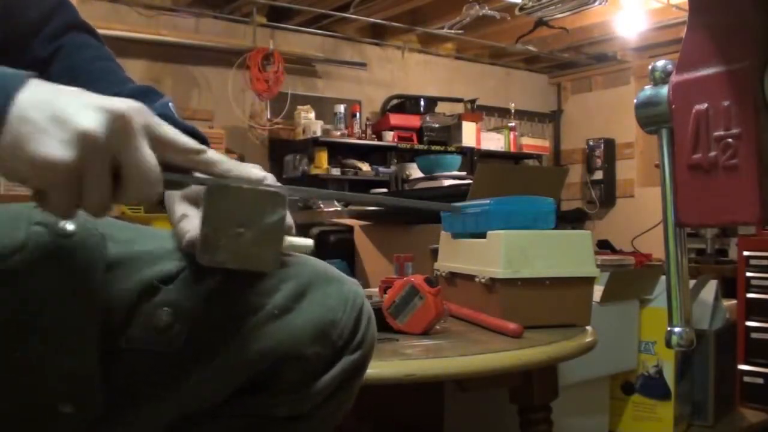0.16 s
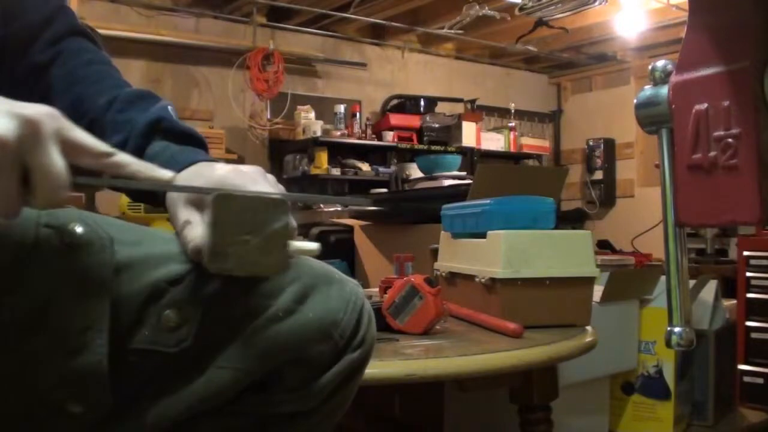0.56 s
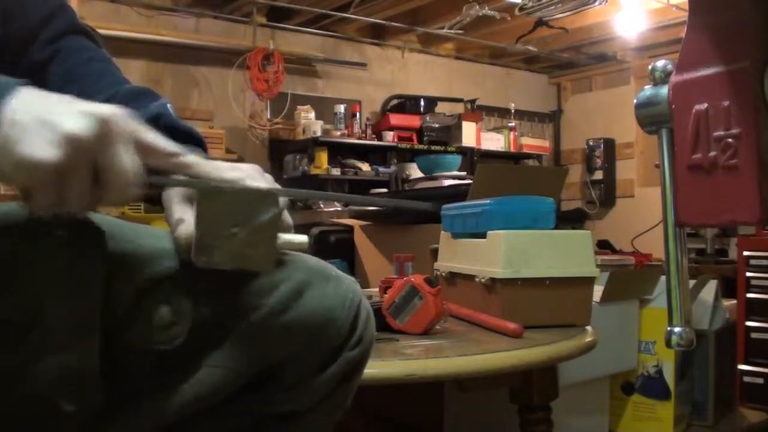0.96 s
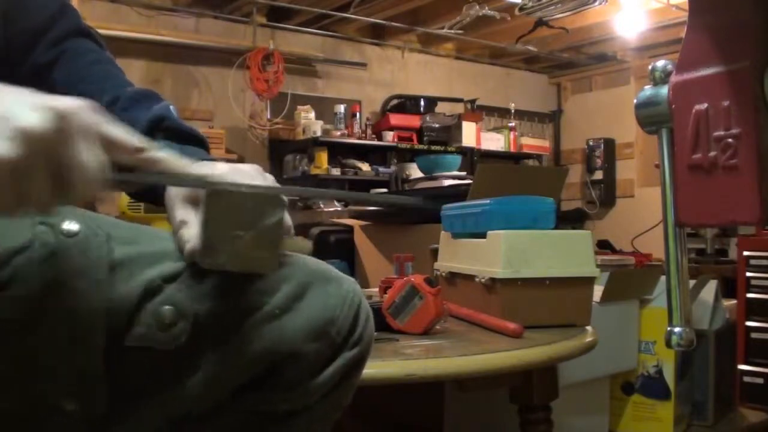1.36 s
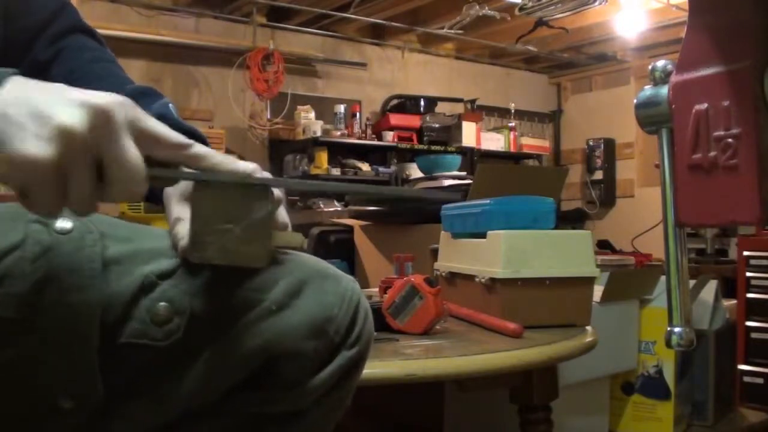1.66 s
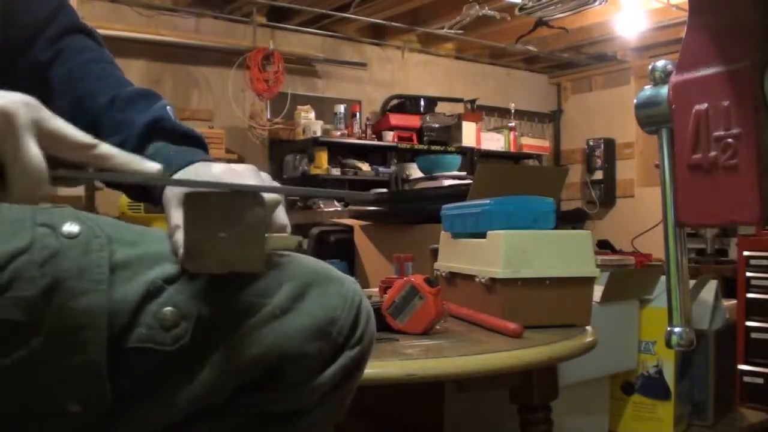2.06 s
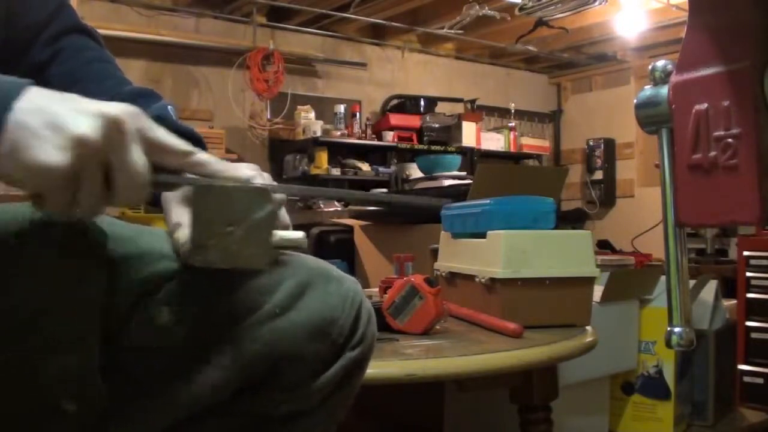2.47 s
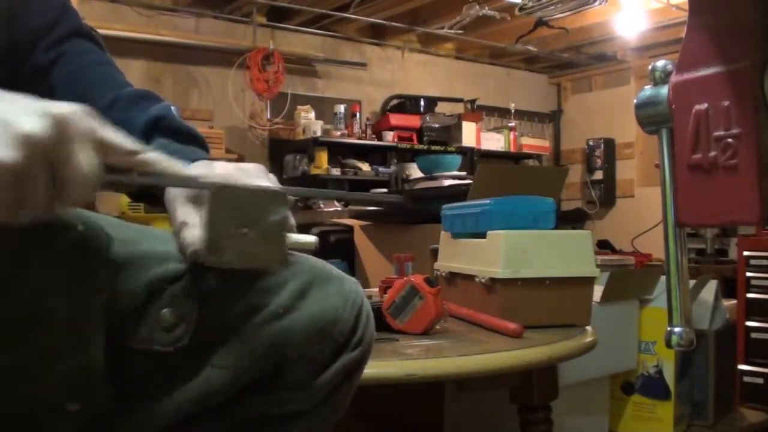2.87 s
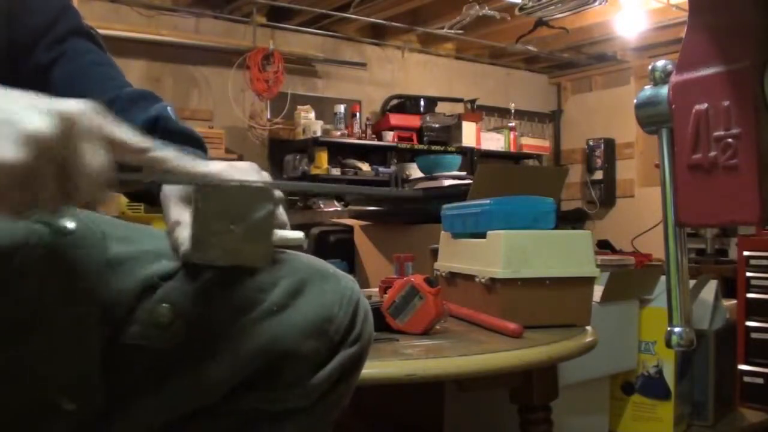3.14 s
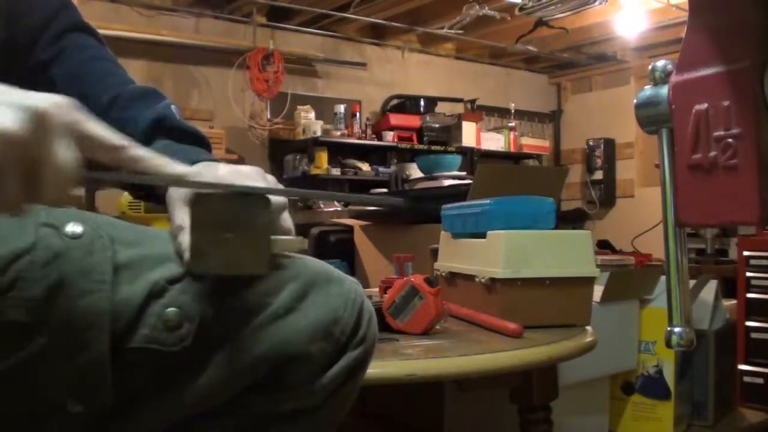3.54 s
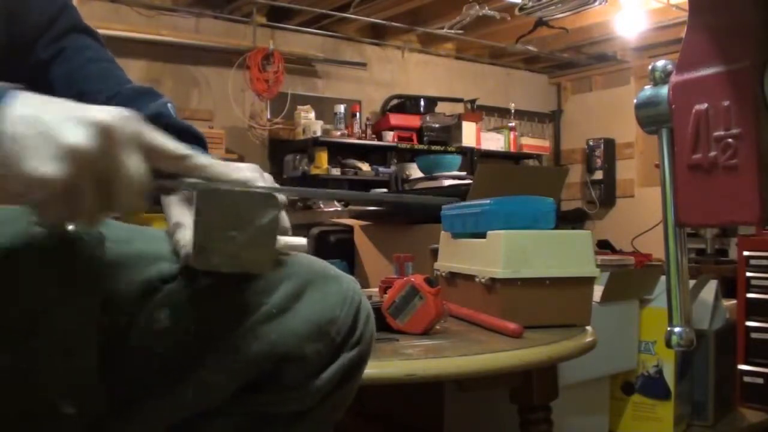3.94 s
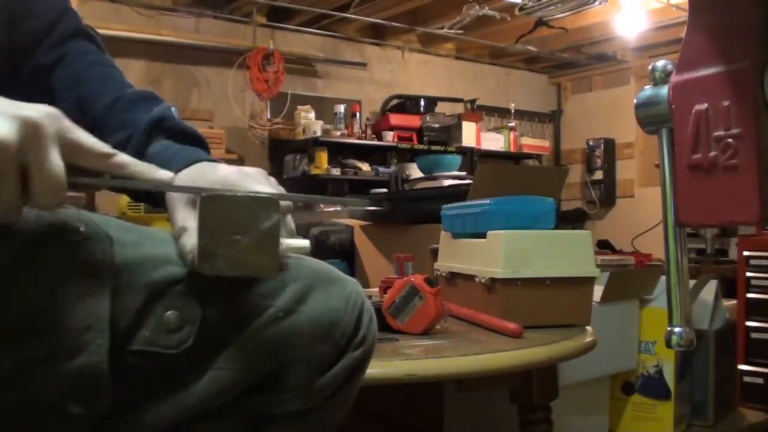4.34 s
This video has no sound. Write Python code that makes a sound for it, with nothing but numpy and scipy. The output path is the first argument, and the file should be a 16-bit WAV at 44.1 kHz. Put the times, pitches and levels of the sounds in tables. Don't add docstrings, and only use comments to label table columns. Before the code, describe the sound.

Close up, a steel hand file rasps to and fro on a small wooden block in a basement workshop. Short, gritty strokes alternate push and pull about eight times a second, bright and metallic. A sharp squeak and wooden click come early, a stuttering squeak just before one second, and a rough scrape and chirp near the end. Dull knocks sit underneath; a nearby stereo microphone catches slight room reverberation.

```python
import sys
import numpy as np
from scipy import signal
from scipy.fft import rfft, irfft, next_fast_len
from scipy.io import wavfile
from scipy.ndimage import uniform_filter1d, map_coordinates

SR = 44100
rng = np.random.default_rng(int(sys.argv[2]) if len(sys.argv) > 2 else 0)


def gain_from_decibels(decibels):
    exponent = np.asarray(decibels, float) / 20
    return 10 ** exponent


def store_wav(level_fs):
    pcm = np.round(np.clip(np.atleast_2d(level_fs), -1, 1) * 32767)
    wavfile.write(sys.argv[1], SR, pcm.T.astype(np.int16))


N = 198538

# f/Hz, width/Hz, level/dB
BLOCK_MODES = [(776.6, 128, -4.5), (945, 130, 1.5), (1182, 26, 0.5)]
BLADE_MODES = [(1415, 19, 3.5), (1475, 160, -5.5), (1600, 100, 0), (1747, 95, -7.5)]
SPINE_MODES = [(1894, 54, 0.5), (2154, 93, 3.5), (2309, 126, 0.5), (2480, 80, -20)]
TANG_MODES = [(3130, 48, 3.5), (3203, 208, 0), (3485, 92, 0.5), (3840, 190, -14.5)]
STEEL_MODES = [(4213, 97, 1), (4327, 98, 3), (4483, 150, -3), (4766, 200, -9), (5210, 110, -11.5)]
# t/s, length/s, force level/dB, ring of the bar level/dB, flex of the bar level/dB
PUSHES = [(-.015, 0.066, -28.5, -18.5, -26), (0.227, .071, -28.5, -15.5, -27),
          (0.481, 0.074, -29, -18, -30), (.721, 0.088, -28.5, -18.5, -33.5),
          (0.982, .072, -29.5, -15, -31.5), (1.238, 0.068, -28, -16, -25),
          (1.489, 0.069, -28, -18.5, -23.5), (1.75, 0.059, -29, -17.5, -24), (1.991, 0.063, -33, -18, -30),
          (2.254, 0.068, -27.5, -16.5, -24), (2.502, 0.069, -27.5, -22, -31.5),
          (2.745, 0.076, -30.5, -22.5, -34.5), (3.002, .065, -26.5, -21, -27.5),
          (3.261, 0.066, -28, -18.5, -21), (3.519, 0.064, -27.5, -19, -21), (3.773, 0.073, -27, -19, -24.5),
          (4.028, 0.067, -27, -22.5, -31), (4.281, 0.058, -32.5, -27, -35.5)]
PULLS = [(0.097, 0.083, -27.5, -18, -27.5), (.354, 0.067, -26, -18.5, -28.5),
         (0.598, 0.083, -27.5, -21, -32), (.849, 0.097, -35, -24.5, -37.5),
         (1.102, 0.07, -27.5, -26.5, -32), (1.36, 0.079, -27.5, -20, -29.5), (1.611, .074, -28, -20, -31.5),
         (1.881, .062, -28, -17.5, -29), (2.127, 0.059, -27, -20.5, -25.5), (2.379, 0.067, -29, -24, -30),
         (2.615, 0.076, -28.5, -20, -32), (2.876, 0.074, -29, -21.5, -34.5), (3.126, .068, -28.5, -23, -29),
         (3.388, 0.063, -27.5, -19.5, -31.5), (3.647, 0.072, -27.5, -21, -32.5),
         (3.906, 0.065, -26.5, -24.5, -31), (4.157, 0.046, -27.5, -18, -36),
         (4.402, 0.072, -30, -20.5, -31)]
STROKES = PUSHES + PULLS


def unit(x):
    return x / np.sqrt(np.mean(x ** 2) + 1e-20)


def along(points, hz):
    f, v = np.transpose(points)
    return np.interp(np.log(hz + 1), np.log(f + 1), v)


def wobble(rate, count=N):
    coarse = np.arange(0, count + 8, 8)
    knots = rng.standard_normal(int(count * rate / SR) + 4)
    curve = map_coordinates(knots, [coarse * rate / SR])
    return np.interp(np.arange(count), coarse, 2 * np.tanh(curve / 2))


def filtered(x, response):
    m = next_fast_len(N + SR // 2)
    return irfft(rfft(x, m) * response(np.fft.rfftfreq(m, 1 / SR)), m)[..., :N]


def bent(x, shift_hz):
    turn = 2 * np.pi * np.cumsum(shift_hz) / SR
    return np.real(signal.hilbert(x, next_fast_len(N))[:N] * np.exp(1j * turn))


def one_mode(f, c, w):
    return 1j * f * w / (c * c - f * f + 1j * f * w)


def resonance(f, modes):
    return sum((-1) ** k * gain_from_decibels(db) * one_mode(f, c, w) for k, (c, w, db) in enumerate(modes))


def ring(modes, drive, wander_db):
    m = next_fast_len(N + SR // 2)
    f, out = np.fft.rfftfreq(m, 1 / SR), 0
    for k, (c, w, db) in enumerate(modes):
        fed = rfft(drive * gain_from_decibels(db + wander_db * wobble(35)), m)
        out = out + fed * (-1) ** k * one_mode(f, c, w)
    width = sum(gain_from_decibels(2 * db) * w for _, w, db in modes)
    return irfft(out, m)[:N] / np.sqrt(np.pi * width / SR)


def grit(depth_db):
    return unit(rng.standard_normal(N) * gain_from_decibels(depth_db * wobble(900) + depth_db * wobble(130)))


def patchy(x, depth_db):
    z = signal.stft(x, nperseg=256)[2]
    field = uniform_filter1d(rng.standard_normal(z.shape), size=3, axis=0)
    field = uniform_filter1d(field, size=3, axis=1)
    return unit(signal.istft(z * gain_from_decibels(depth_db * unit(field)), nperseg=256)[1][:N])


def tail(decays, count):
    hz, t, z = signal.stft(rng.standard_normal((count, SR // 2)), SR, nperseg=256)
    out = signal.istft(z * gain_from_decibels(-60 * t / along(decays, hz)[:, None]), SR, nperseg=256)[1]
    return out / np.linalg.norm(out[0])


def room_air():
    # f/Hz, density level/dB per Hz
    air_density = [(20, 9), (60, -1), (120, 13), (250, 12), (600, 13.5), (2000, -45), (8000, -32),
                   (12000, -19), (16000, -23)]
    return gain_from_decibels(-55.5) * unit(filtered(rng.standard_normal(N), lambda f: gain_from_decibels(along(air_density, f))))


def cellar_walls(near):
    # f/Hz, t60/s
    cellar_decay = [(200, 1), (1500, 0.46), (5000, 0.25), (12000, 0.23)]
    delayed = np.pad(near, (250, 0))[None]
    return signal.fftconvolve(delayed, tail(cellar_decay, count=2), axes=1)[:, :N]


def two_ports(mid, wall):
    # f/Hz, level/dB
    port_difference = [(20, -34), (60, -24), (150, -37), (300, -16), (600, -16), (1200, -14.5), (2500, -15),
                       (5000, -15.5), (9000, -12.5), (10500, -51), (12500, -89)]
    # f/Hz, level/dB
    port_lean = [(500, -0.5), (1000, 0.2), (3000, 1.06), (9000, 0.6)]
    bench = signal.fftconvolve(mid, tail([(1000, 0.041)], count=1)[0])[:N] + gain_from_decibels(-11.0) * wall
    bench = np.real(signal.hilbert(bench, next_fast_len(N))[:N] * np.exp(3j * wobble(14)))
    side = filtered(bench, lambda f: gain_from_decibels(along(port_difference, f)))
    lean = lambda f: gain_from_decibels(along(port_lean, f) * (f < 12000) * [[.5], [-.5]])
    return filtered(mid, lean) + side * [[1], [-1]]


def knocks(events, attack, sag, climb=0):
    out, t = np.zeros(N + SR), np.arange(SR // 5) / SR
    for s, db, hz, t60 in events:
        turn = 2 * np.pi * hz * t * (1 + climb * (t / 0.011 - 1))
        body = np.sin(turn) + sag * np.sin(turn * .5) * np.minimum(t / 0.012, 1)
        out[round(s * SR):][:len(t)] += gain_from_decibels(db - 60 * t / t60) * body * (1 - np.exp(-t / attack))
    return out[:N]


def block_knocks():
    # t/s, peak level/dB, f/Hz, t60/s
    slip_events = [(0.0975, -20, 2300, .015), (0.1715, -8.5, 2240, 0.026), (1.8568, -21, 1600, 0.021),
                   (3.1178, -25, 2520, 0.02), (4.4158, -12, 2350, 0.021)]
    # t/s, peak level/dB, f/Hz
    catch_events = [(.229, -19, 710), (.48, -16.5, 649), (.725, -25.5, 633), (1.238, -17, 719.5),
                    (1.49, -17, 714), (1.582, -24, 725), (1.751, -25, 720), (1.856, -27, 416),
                    (1.993, -22, 710), (2.252, -22, 642), (2.61, -31, 404.4), (3.002, -25.5, 717),
                    (3.378, -27.5, 409)]
    # t/s, peak level/dB
    push_jolts = [(.215, -45), (.593, -36), (.778, -48), (1.029, -43), (1.273, -39), (1.509, -43),
                  (1.753, -36), (2.008, -45.5), (2.254, -47), (2.51, -40), (2.785, -35), (3.034, -39.5),
                  (3.264, -41), (3.522, -41), (3.777, -37), (4.035, -34), (4.288, -44)]
    pull_jolts = [(.837, -42), (1.9, -47), (2.128, -48), (3.115, -45), (4.152, -53)]
    jolts = []
    for rows, hz in [(push_jolts, 266), (pull_jolts, 294)]:
        for s, db in rows:
            t60 = max(.095 - .004 * (db + 42), .03)
            jolts.append((s, db, hz, t60))
    catches = [(*row, 0.04) for row in catch_events]
    out = knocks(slip_events, 0.00074, sag=0.092)
    out += knocks(catches, 0.0056, sag=0.04, climb=0.23)
    return out + gain_from_decibels(2.5) * knocks(jolts, 0.0024, sag=0.45, climb=-.05)


def swing(s, hz):
    n = np.arange(round(s[0] * SR), min(N, round(s[-1] * SR)))
    shake = 1 + .015 * wobble(200, len(n))
    return n, 2 * np.pi * np.cumsum(np.interp(n / SR, s, hz) * shake) / SR


def scrape():
    # t/s, note level/dB, f/Hz, grit over note level/dB
    squeal_course = [(4.175, -38, 952, 20), (4.195, -26, 928, 4), (4.207, -28.5, 862, 17),
                     (4.231, -19.5, 888.4, 10.5), (4.297, -30, 902, 12), (4.336, -43, 866, 14),
                     (4.4, -44, 890, 9)]
    # f/Hz, width/Hz, level/dB
    chatter_modes = [(757, 150, -6), (1750, 200, 1.5), (2450, 290, 1), (3390, 370, 1.5), (4320, 144, 12),
                     (5100, 1400, -0.5), (5760, 210, 6), (7160, 290, -2)]
    s, db, hz, grit_db = np.transpose(squeal_course)
    n, turn = swing(s, hz)
    note, puffs, edges = np.zeros(N), np.zeros(N), signal.windows.tukey(len(n), .15)
    tone = np.sin(turn) + .15 * np.sin(2 * turn)
    note[n] = gain_from_decibels(np.interp(n / SR, s, db) + 1.5 + 4 * wobble(170)[n]) * edges * tone
    snap = 3 * .3 * np.cos(turn / 2) ** 28
    puffs[n] = gain_from_decibels(np.interp(n / SR, s, db + grit_db)) * edges * (grit(1.6)[n] * (1 + np.cos(turn)) + snap)
    rattle = ring(chatter_modes, puffs, wander_db=4.0)
    return note + gain_from_decibels(-7) * filtered(rattle, lambda f: 1 / (1 + (f / 8000) ** 6))


def squeal(s, hz, db, over_db):
    out, (n, turn) = np.zeros(N), swing(s, hz)
    stack = sum(gain_from_decibels(6 + 2 * wobble(110, len(n))) * np.sin(k * turn) / k ** .8 for k in range(2, 7))
    stack = stack * (.9 + .5 * wobble(900, len(n)))
    note = gain_from_decibels(3.5 * wobble(150, len(n))) * np.sin(turn) + gain_from_decibels(over_db) * stack
    out[n] = gain_from_decibels(np.interp(n / SR, s, db) + 3.0) * signal.windows.tukey(len(n), .15) * note
    return out


def squeaks():
    squeak_events = [(.176, 0.017, 978, -21, 400), (.438, 0.023, 964, -28, 500),
                     (.872, 0.019, 1193, -25.5, 2000), (.915, .02, 956, -36, -600),
                     (1.695, 0.03, 1080, -32.5, -300), (2.893, 0.013, 1172, -33, -100),
                     (3.965, 0.031, 1040, -38, 300), (4.425, 0.022, 1121, -22, -1500)]
    # t/s, level/dB
    stutter_course = [(.926, -43), (0.939, -21), (.946, -17), (0.952, -30), (.959, -22), (0.967, -38.5),
                      (.99, -27), (1.004, -50), (1.05, -40)]
    s, db = np.transpose(stutter_course)
    out = squeal(s, 914 - 110 * (s - s[0]), db, over_db=-5.5)
    fall_over_rise, swell_db = 1.28, 16.5
    for peak, rise, hz, db, glide in squeak_events:
        t = rise * np.array([-1, 0, fall_over_rise])
        out += squeal(peak + t, hz + glide * t, db - swell_db * (t != 0), over_db=-12)
    return out


def by_way(push_pull):
    return np.repeat(push_pull, [len(PUSHES), len(PULLS)])


def pressure(rise, fall, level_db, fade_db=0):
    t, force = np.arange(N) / SR, np.zeros(N)
    early_db, slack_db, late_db = by_way((1.5, 1.84)), by_way((-1.7, -0.84)), by_way((-0.24, -0.3))
    shapes = np.transpose([early_db + fade_db, slack_db, late_db - fade_db])
    for (s, length, *_), db, (early, middle, late) in zip(STROKES, level_db, shapes):
        at = s + np.array([-.03, -rise, rise, 0.28 * length, .5 * length, 0.72 * length,
                           length, length + fall, length + 2 * fall])
        level = [-50, early - 24, early - 2, early, middle, late, late - 5, late - 22, -70]
        near = slice(*np.searchsorted(t, at[[0, -1]]))
        force[near] += gain_from_decibels(np.interp(t[near], at, level) + db)
    return force


def speed():
    t, share, rate = np.arange(N) / SR, np.zeros(N), np.full(N, 150.)
    lead_s, sweep = .008, 1.45
    for s, length, *_ in STROKES:
        start, span = s - lead_s, sweep * length
        near = slice(*np.searchsorted(t, [start, start + span]))
        arch = np.sin(np.pi * np.clip((t[near] - start) / span, 0, 1) ** .75) ** .7
        top_hz = 837 * (1 + .16 * rng.standard_normal())
        share[near] = np.maximum(share[near], arch)
        rate[near] = np.maximum(rate[near], top_hz * arch)
    return share, rate


def teeth(rate):
    turn = 2 * np.pi * np.cumsum(rate * (1 + .017 * wobble(150))) / SR
    sizes = [.35, 1.2, .9, .8, .4, .3]
    return unit(sum(size * gain_from_decibels(4.5 * wobble(80)) * np.sin(k * turn) for k, size in enumerate(sizes, start=1)))


def tooth_tone(flex, share, rate):
    force = pressure(0.0056, 0.053, flex + by_way((-14, -11)), fade_db=-2.0)
    bite = force * teeth(rate) * share ** 0.47
    aired = filtered(bite, lambda f: 1 / (1 + (800 / (f + 1)) ** 6))
    parts = BLOCK_MODES + BLADE_MODES + SPINE_MODES + TANG_MODES + STEEL_MODES
    return gain_from_decibels(5) * aired + gain_from_decibels(-2) * filtered(bite, lambda f: resonance(f, parts))


def fibre_hiss(force, share):
    # f/Hz, density level/dB per Hz
    hiss_density = [(500, -34.5), (1500, -14), (4000, -4), (6500, -2), (9200, 1), (10500, -5), (12500, -14),
                    (14000, -21.5), (16000, -29)]
    hiss = unit(filtered(grit(0.34), lambda f: gain_from_decibels(along(hiss_density, f))))
    return gain_from_decibels(4) * pressure(.008, .012, force) * (.6 + .4 * share) * patchy(hiss, depth_db=3.5)


def low_modes(flex, share):
    # t/s, level/dB
    hold_course = [(0, -0.5), (.6, 1), (1, -3.5), (1.5, 0.5), (2, -0.5), (2.3, -5), (3, -2), (3.4, -7.5),
                   (4.5, -0.5)]
    # t/s, level/dB
    tilt_course = [(0, -0.5), (.6, 0), (1.2, -0.5), (1.6, -3), (2.2, 3), (2.7, -1), (3.2, 1.5), (3.8, -0.5),
                   (4.5, -1)]
    starts = np.transpose(STROKES)[0]
    hold = np.interp(starts, *np.transpose(hold_course))
    tilt = np.interp(starts, *np.transpose(tilt_course))
    load = uniform_filter1d(share, size=900) - .8
    on_block = pressure(0.0017, 0.058, flex + hold + by_way((-1.04, -9)), fade_db=3) * grit(1.9)
    on_blade = pressure(0.0052, 0.027, flex + tilt + by_way((-0.4, -1))) * grit(2.5)
    on_spine = pressure(0.0036, 0.023, flex - tilt + by_way((.8, 1))) * grit(1.2)
    out = gain_from_decibels(-4) * ring(BLOCK_MODES, on_block, wander_db=3.5)
    out += gain_from_decibels(-1.2) * bent(ring(BLADE_MODES, on_blade, wander_db=4), 260 * load)
    return out + gain_from_decibels(-2) * bent(ring(SPINE_MODES, on_spine, wander_db=5), 400 * load)


def high_modes(force, steel):
    # f/Hz, width/Hz, level/dB
    edge_modes = [(5591, 163, -5), (5680, 135, -1), (7036, 100, -11), (7201, 45, -1), (8925, 93, -9)]
    on_steel = pressure(0.0038, 0.0066, steel) * grit(0.83)
    on_edge = pressure(0.0089, 0.0088, force + by_way((12, 11))) * grit(2.1)
    on_tang = pressure(0.009, 0.035, force + by_way((0.9, -3))) * grit(3.6)
    out = gain_from_decibels(-3.5) * bent(ring(STEEL_MODES, on_steel, wander_db=5), 45 * wobble(14))
    out += gain_from_decibels(-4.5) * bent(ring(edge_modes, on_edge, wander_db=4.5), 35 * wobble(14))
    return out + gain_from_decibels(-1.5) * ring(TANG_MODES, on_tang, wander_db=4.5)


def rasp():
    force, steel, flex = np.transpose(STROKES)[2:]
    share, rate = speed()
    uneven = gain_from_decibels(1.06 * wobble(40))
    out = high_modes(force, steel) + low_modes(flex, share)
    return uneven * (out + fibre_hiss(force, share) + tooth_tone(flex, share, rate))


def scene():
    near = rasp() + squeaks() + scrape() + block_knocks()
    walls = cellar_walls(near)
    mid = near + gain_from_decibels(-12) * walls[0] + room_air()
    return two_ports(mid, walls[1])


def top_cut(x):
    return signal.sosfilt(signal.butter(12, 16860, fs=SR, output="sos"), x)


def record(dry):
    soft = dry / (1 + np.abs(dry / .8) ** 4) ** (1 / 4)
    mix = filtered(soft, lambda hz: hz < 15900)
    return top_cut(mix)


dry = scene()
out = record(dry)
store_wav(out)
```